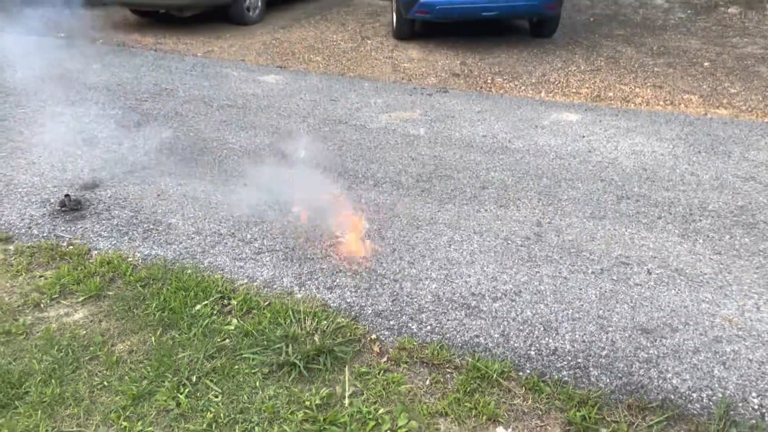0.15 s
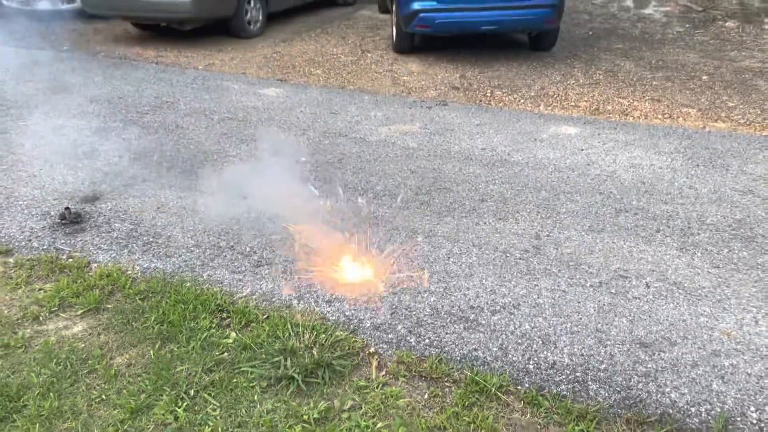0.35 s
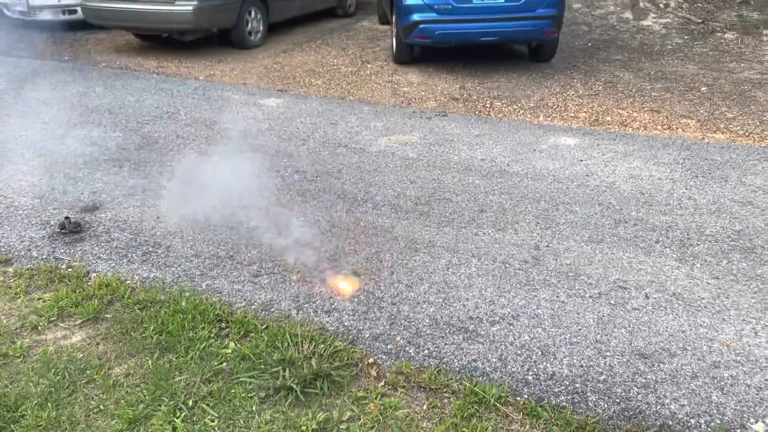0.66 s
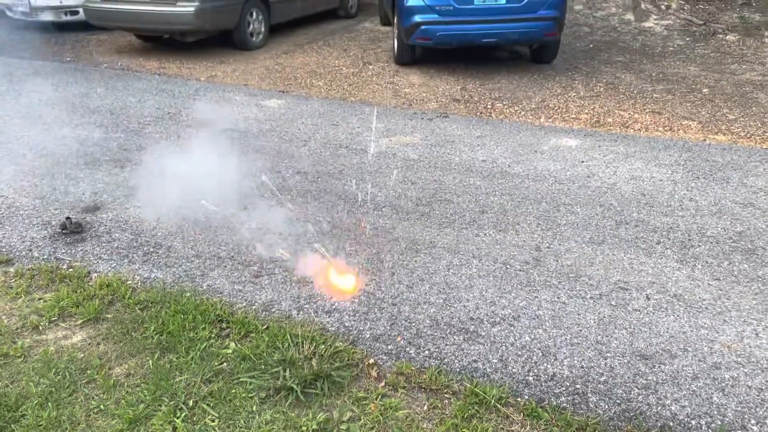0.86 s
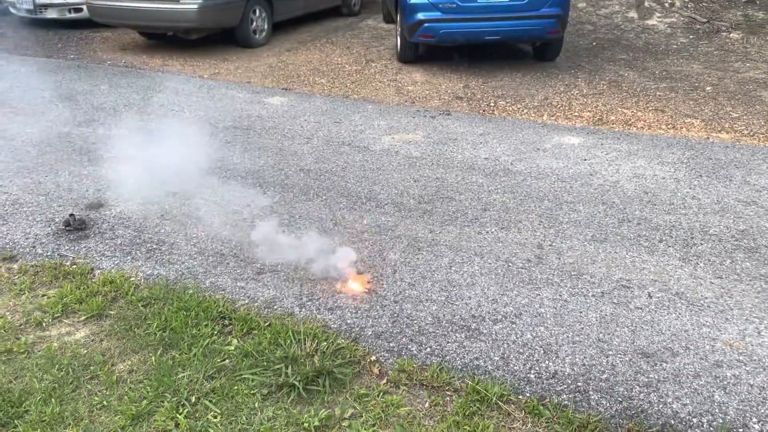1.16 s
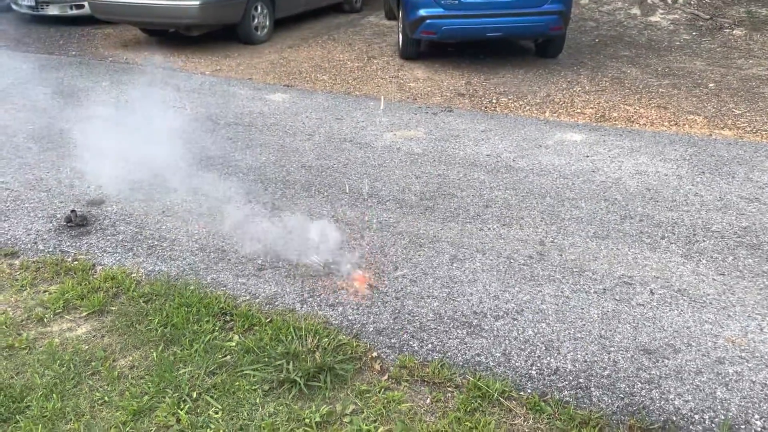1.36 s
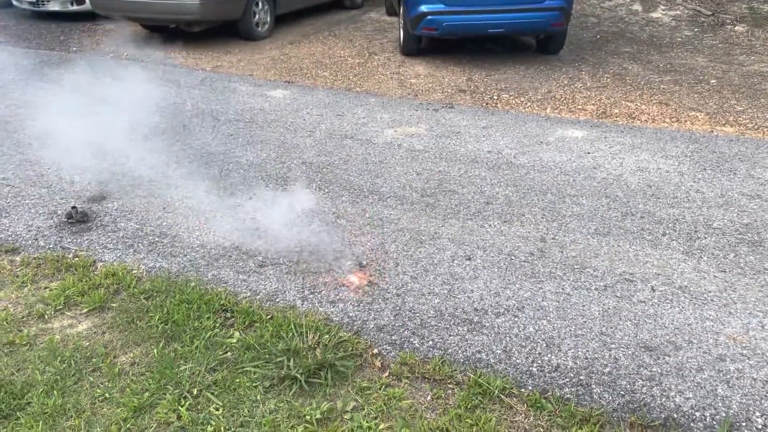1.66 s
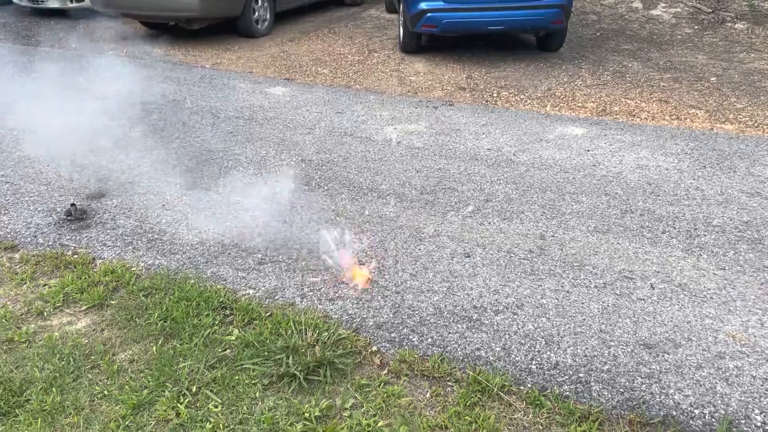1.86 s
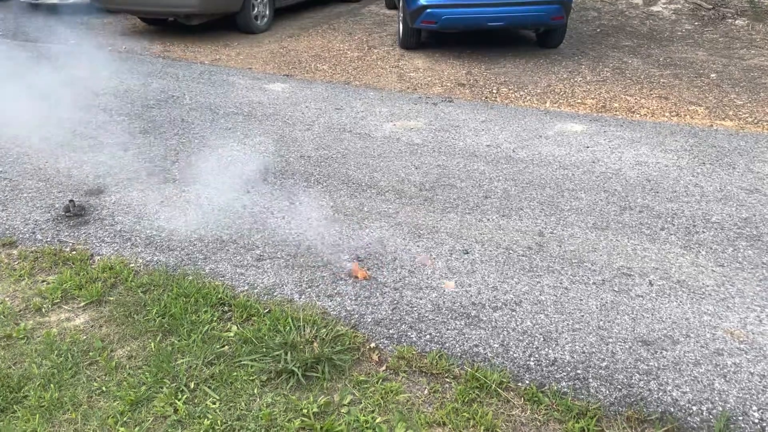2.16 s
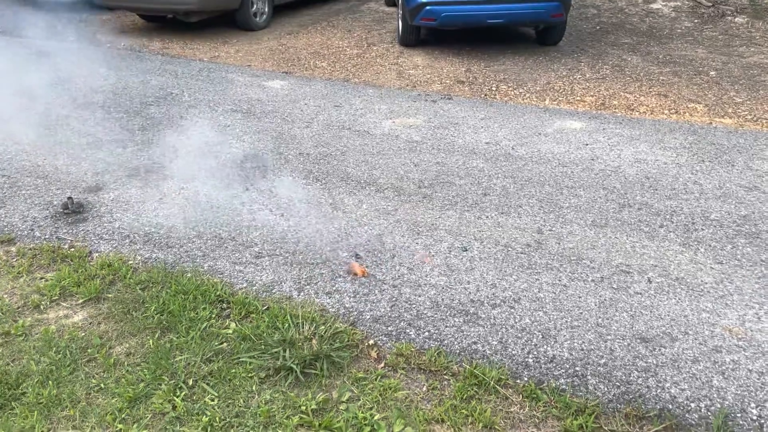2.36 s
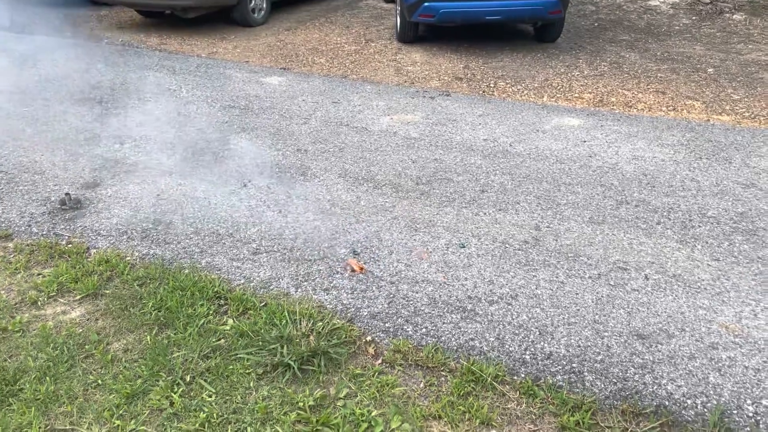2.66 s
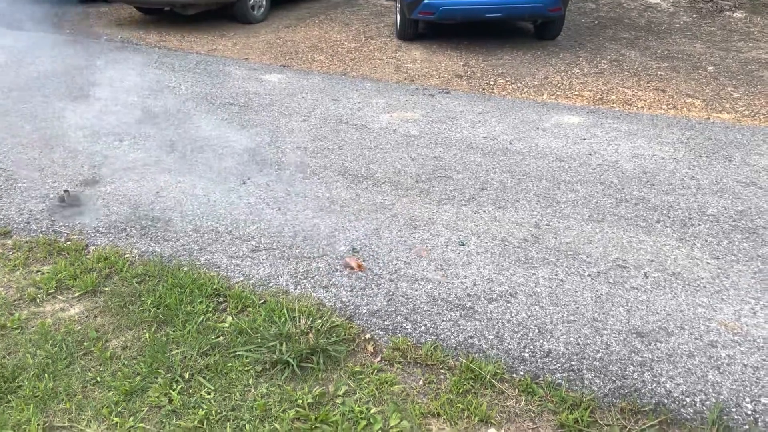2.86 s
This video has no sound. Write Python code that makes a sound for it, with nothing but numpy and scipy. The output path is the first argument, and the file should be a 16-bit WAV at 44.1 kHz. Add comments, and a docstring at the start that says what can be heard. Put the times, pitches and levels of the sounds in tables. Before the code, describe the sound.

Bright cracking pops from a burning firework, tightly bunched then more widely spaced, each with a brief echo off cars and yard. The soft flame roar fades to near silence before a final single pop.

```python
"""Small firework burning out on a gravel drive

Sharp pops, dense at first, then scattered over three seconds. Each is a click with a short noise splutter,
a hollow knock and a falling thump; nearby walls and cars send back slaps and the yard rings on in decaying
noise. Under it the flame is shaped noise, with a wavering low hum of sines and faint outdoor hiss.
Two microphone ports hear it slightly apart; splutter and knock smear ahead of each pop, as audio coding does."""
import sys
import numpy as np
from scipy import signal
from scipy.fft import rfft, irfft, next_fast_len
from scipy.io import wavfile
from scipy.ndimage import uniform_filter1d

SR = 44100
rng = np.random.default_rng(int(sys.argv[2]) if len(sys.argv) > 2 else 0)


def transcribe(signal):
    """Save signal, clipped to [-1, 1], as a 16-bit WAV file at the path in sys.argv[1]."""
    frames = np.atleast_2d(signal).T
    limited = np.clip(frames, -1, 1)
    pcm = np.round(limited * 32767).astype(np.int16)
    wavfile.write(sys.argv[1], SR, pcm)


N = 132300  # samples, 3 s

# The pops, levels relative within each column. Each row: start in seconds, crack peak in dB,
# splutter in dB, knock in dB, thump in dB, yard ring in dB, slaps in dB.
POPS = [(0.0039, -23.5, -46, -57, -52, -39, -55.5), (0.1259, -12, -15, -13.5, -15.5, -30, -49.5),
        (0.1484, -15, -17.5, -5, -60, -43, -48.5), (0.1498, -12, -13.5, -9, -40, -47, -48.5),
        (0.1516, -16, -18, -16.5, -8, -43.5, -50), (0.198, -12.5, -25, -42.5, -39, -41, -49.5),
        (0.2533, -3, -35.5, -39.5, -53, -34.5, -49), (0.2815, -26, -37.5, -51, -56, -45, -51),
        (0.2928, 0, -23, -24, -16.5, -39.5, -46.5), (0.3164, 2, -29.5, -38, -27.5, -41.5, -58),
        (0.3331, -4.5, -26, -31, -43, -50, -49.5), (0.3409, -20, -33, -38.5, -41.0, -60.5, -62.5),
        (0.3467, -6, -33, -41, -75, -44, -50.5), (0.3767, -7, -13.5, -33, -32.5, -41, -54),
        (0.3799, -14, -31.5, -32.5, -38.5, -50, -47.5), (0.514, -9, -15.5, -17.5, -16.5, -28, -45),
        (0.5152, -11.5, -23, -22.5, -66, -71, -48), (0.5581, -2, -26, -36.5, -31.5, -30, -37.5),
        (0.5796, 0, -18.5, -27.5, -20, -34, -39), (0.5929, 2.5, -29.5, -26, -23.0, -31.5, -44),
        (0.6084, -1, -21.5, -37, -32, -42, -39.5), (0.6181, -1, -21, -33, -30, -38.5, -46.5),
        (0.712, -3.5, -23.5, -43, -33.5, -44, -44), (0.727, -1, -29.0, -37.5, -35.5, -56.5, -56),
        (0.7858, -22, -35.5, -46, -38, -39, -59), (0.8602, -1.5, -14, -27.5, -16.5, -29, -38.5),
        (0.9631, 3.5, -17.5, -30, -32.5, -35.0, -40), (1.0225, -4, -25.5, -38, -43, -41, -43.5),
        (1.072, -1.5, -17, -29.5, -23.5, -27.5, -36.5), (1.215, -2.5, -18, -33, -29.5, -35.0, -40),
        (1.3075, 3, -19.5, -23.5, -22.5, -32, -33.5), (1.322, -6, -13.5, -18.5, -17, -41, -41.5),
        (1.3618, 0, -23, -32, -26.5, -34.5, -39), (1.4206, -12, -36, -32, -34.5, -40.5, -51),
        (1.5817, -31.5, -50.5, -55, -43, -59, -75), (1.7, -1, -14, -22.5, -16.5, -29.5, -34.5),
        (1.854, -3, -26.5, -39, -30.5, -34, -40), (1.8569, 2, -13.5, -27.5, -25, -38, -37),
        (2.9078, -2.5, -32.0, -59.5, -46, -45.5, -49)]


def amp(db):
    """Amplitude factor for a level in dB."""
    return 10 ** (np.asarray(db, float) / 20)


def evened(x):
    """Scales a signal to an RMS of one."""
    return x / np.sqrt(np.mean(x ** 2) + 1e-20)


def read(points, at, axis=1):
    """Reads one table column along straight lines."""
    return np.interp(at, [p[0] for p in points], [p[axis] for p in points])


def read_log(points, hz, axis=1):
    """Reads one table column along a logarithmic frequency scale."""
    return np.interp(np.log(hz + 1), np.log([p[0] + 1 for p in points]), [p[axis] for p in points])


def coloured(x, tone):
    """Shapes a signal by a spectrum given in dB."""
    hz = np.fft.rfftfreq(len(x), 1 / SR)
    return irfft(rfft(x) * amp(read_log(tone, hz)), len(x))


def coloured_noise(tone):
    """Steady noise of the given spectrum, at an RMS of one."""
    return evened(coloured(rng.standard_normal(N), tone))


def pair(shared, make):
    """Two signals, partly the same: shared runs from 0 (independent) to 1 (identical)."""
    shared = np.clip(shared, 0, 1)
    left = make()
    right = shared * left + np.sqrt(1 - shared ** 2) * make()
    return np.array([left, right])


def narrow(hz, width_hz):
    """A fuzzy tone: slow complex noise carried up to hz, at an RMS of one."""
    pole = np.exp(-np.pi * width_hz / SR)
    noise = rng.standard_normal(N + SR) + 1j * rng.standard_normal(N + SR)
    slow = signal.lfilter([1], np.convolve([1, -pole], [1, -pole]), noise)
    carrier = np.exp(2j * np.pi * hz * np.arange(N) / SR)
    return evened((slow[SR:] * carrier).real)  # the first second lets the filter settle


def clicks(axis):
    """One impulse per pop, sized by one column of POPS."""
    out = np.zeros(N)
    for row in POPS:
        out[round(row[0] * SR)] += amp(row[axis])
    return out


def air():
    """Faint steady outdoor hiss: shaped noise, little of it common to both ports."""
    # Spectrum of the air. Each row: frequency in Hz, relative level in dB.
    air_tone = [(18, -44), (30, -14.5), (113, -12.5), (969, -27), (2870, -40), (7270, -36), (8530, -44.5),
                (10800, -32.5), (17000, -57.5)]
    return amp(-69.5) * pair(0.2, lambda: coloured_noise(air_tone))


def hum():
    """A low hum of sines on multiples of one wandering pitch, each wavering in level by itself."""
    # Fading of the hum. Each row: time in seconds, level in dB.
    hum_fade = [(0, -48), (.6, -61), (1.7, -62.5), (2.2, -67.5), (2.72, -67.5), (2.82, -82.5), (3, -83)]
    # Its overtones. Each row: multiple of the pitch, relative level in dB.
    hum_orders = [(1, 0), (2, -11), (3, -10), (4, -16)]
    pitch_hz, wander_hz, waver_db = 108.7, 2.5, 2.5  # wander and waver are RMS
    turns = np.cumsum(pitch_hz + wander_hz * narrow(2.6, 12)) / SR
    tone = np.zeros(N)
    for order, db in hum_orders:
        tone += amp(db + waver_db * narrow(4, 6)) * np.sin(2 * np.pi * order * turns)
    return np.sqrt(2) * tone * amp(read(hum_fade, np.arange(N) / SR))


def flame():
    """Lumpy narrow-band rumble, and a dull roar with hiss, all dying with the burn."""
    # Course of the burn. Each row: time in seconds, rumble in dB, roar in dB, hiss in dB.
    burn = [(0, -48.5, -50, -49.5), (.11, -43, -45.5, -43.5), (.22, -41, -55.5, -55),
            (.34, -52, -53.5, -57), (.96, -45, -62, -58.5), (1.13, -53, -59.5, -65),
            (1.36, -53.5, -65, -57), (1.5, -57, -65, -64), (1.84, -50.5, -64, -62), (1.93, -65, -65.5, -62),
            (2.15, -66, -68, -68), (2.49, -83, -74, -73), (3, -80.5, -66.5, -72.5)]
    # Spectrum of the roar. Each row: frequency in Hz, relative density in dB per Hz.
    roar_tone = [(60, -9), (150, -2.4), (350, -4), (700, -22.5), (3000, -45.5)]
    # Spectrum of the hiss. Each row: frequency in Hz, relative density in dB per Hz.
    hiss_tone = [(200, -19), (550, -1), (1200, -4.5), (2500, -5), (6000, -22), (16000, -27.5)]
    t = np.arange(N) / SR
    rumble = pair(0.8, lambda: narrow(50, 45))
    rumble = rumble * amp(-1.2 * narrow(7.7, 4.3))  # lumps of 1.2 dB RMS
    roar = pair(0.6, lambda: coloured_noise(roar_tone))
    hiss = pair(0.4, lambda: coloured_noise(hiss_tone))
    rumble = rumble * amp(read(burn, t, axis=1))
    return rumble, roar * amp(read(burn, t, axis=2)) + hiss * amp(read(burn, t, axis=3))


def ring():
    """Grainy late scatter from the yard: noise in which each band dies at its own speed."""
    # Decay of the yard. Each row: frequency in Hz, time to fall by 60 dB in seconds.
    decay_times = [(150, .3), (500, 0.17), (1500, .75), (4000, 0.77), (9000, 0.61), (15000, .5)]
    # Spectrum of the ring at its start. Each row: frequency in Hz, relative level in dB.
    ring_tone = [(100, -3), (400, -10), (1000, -9), (1600, -0.5), (2300, -6), (3300, 0), (4500, -4),
                 (5800, 0), (7500, -2.5), (11000, -7), (13000, -5.5), (16000, 0)]
    start_s, rise_s, grain_db = .012, .014, 3
    size = SR + SR // 2
    grain = amp(grain_db * evened(uniform_filter1d(rng.standard_normal(size), 60)))
    hz, t, bands = signal.stft(evened(rng.standard_normal(size) * grain), SR, nperseg=256)
    fall_db = 60 * t / read_log(decay_times, hz)[:, None]
    bands = bands * amp(read_log(ring_tone, hz)[:, None] - fall_db)
    tail = signal.istft(bands, SR, nperseg=256)[1]
    late = np.maximum(np.arange(len(tail)) / SR - start_s, 0)
    return tail * (1 - np.exp(-late / rise_s))


def slaps():
    """Short smeared returns from nearby walls and cars: decaying noise bursts, each after its own delay."""
    # The returns. Each row: delay in seconds, relative level in dB, spread (decay) in seconds,
    # treble tilt above 2 kHz in dB per octave.
    returns = [(0.015, -6.5, .001, -7.2), (0.0258, 6, 0.0012, -4), (0.032, -9, 0.0017, -0.6),
               (.042, -3, 0.00091, 2.5), (.0449, 3, .0006, -2.06), (0.0553, 12, 0.00016, 3.5)]
    size = 4096
    t, out = np.arange(size) / SR, np.zeros(size)
    for delay, db, spread, tilt_db in returns:
        tone = [(500, -tilt_db - 7.0), (2000, -tilt_db), (16000, 2 * tilt_db)]
        burst = evened(coloured(rng.standard_normal(size), tone))
        fall = np.exp(-np.maximum(t - delay, 0) / spread)
        out += amp(db) * burst * (t > delay) * fall
    return out


def yard():
    """Ring and slaps: successive pops take turns among three random tails, so their echoes vary."""
    late, near, out = clicks(axis=5), clicks(axis=6), np.zeros((2, N))
    turn = np.cumsum(late > 0) % 3
    for tail in range(3):
        chosen = turn == tail
        out += signal.fftconvolve((late * chosen)[None], pair(0.86, ring), axes=1)[:, :N]
        out += amp(10.5) * signal.fftconvolve(near * chosen, slaps())[:N]
    return out


def knocks():
    """A short hollow 1270 Hz knock dying after each crack, smeared ahead of it as by audio coding."""
    knock_hz, smear_s, decay_s = 1270, 0.0019, 0.0012
    t = np.arange(-600, 600) / SR
    envelope = np.exp(np.where(t < 0, t / smear_s, -t / decay_s))
    wave = envelope * np.cos(2 * np.pi * knock_hz * t)
    return signal.oaconvolve(clicks(axis=3), wave)[600:600 + N]


def thumps():
    """The pressure push, drawn out into a wave whose swings grow longer; stronger pushes last longer."""
    turns, first_s, soft_s = .94, .004, 0.0018  # turns: cycles per e-fold of time; soft_s: onset
    decay_s, longer_per_db, ref_db = 0.011, 0.0552, -18  # decay_s holds at ref_db in the thump column
    size = 4000
    t, out = np.arange(1, size + 1) / SR, np.zeros(N + size)
    wave = np.cos(2 * np.pi * turns * np.log(t / first_s)) * (1 - np.exp(-(t / soft_s) ** 2))
    for row in POPS:
        start, db = round(row[0] * SR), row[4]
        decay = decay_s * np.exp(longer_per_db * (db - ref_db))
        out[start:start + size] += amp(db + 3.0) * wave * np.exp(-t / decay)
    return out[:N]


def cracks():
    """A sharp click, its ground bounce and a few milliseconds of splutter with a faint dull smear ahead."""
    # Spectrum of the splutter. Each row: frequency in Hz, relative level in dB.
    splutter_tone = [(200, -1), (600, -4.5), (850, -2), (1270, 8), (1450, -10), (1630, 7.5), (1850, 8),
                     (2150, -2), (2550, 4), (3200, 1.5), (4500, -2.5), (8000, -7.5), (16000, -5.5)]
    decay_s, smear_s, smear_db, smear_top_hz = .0017, .0022, -5, 8000
    bounce_s, bounce_db = .00038, -13
    t = np.arange(700) / SR
    size = clicks(axis=2)
    after = signal.oaconvolve(size, np.exp(-t / decay_s))[:N]
    # A decay run backwards in time: the smear ahead of each pop, as left by audio coding.
    before = signal.oaconvolve(size[::-1], np.exp(-t / smear_s))[:N][::-1] * amp(smear_db)
    dull = signal.butter(6, smear_top_hz, fs=SR, output="sos")

    def splutter():
        """Noise under the two envelopes, the smear low-passed."""
        burst = after * rng.standard_normal(N)
        smear = signal.sosfilt(dull, before * rng.standard_normal(N))
        return coloured(burst + smear, splutter_tone)

    grit = pair(0.67, splutter)
    click = clicks(axis=1)
    bounce = -amp(bounce_db) * np.roll(click, round(bounce_s * SR))  # inverted return from the ground
    return amp(8.5) * (click + bounce) + amp(11.5) * grit


def ports(left, right, flat=False):
    """Colour of each microphone port, unless flat: minimum phase on the left, a table turning the right."""
    # Colour of the ports. Each row: frequency in Hz, left in dB, right in dB.
    port_tone = [(100, -13.5, -28), (278, -25.5, -19.5), (556, -5, -7), (1300, -5.5, -5.5),
                 (1620, -10.5, -8.5), (2213, 3.5, -6), (2410, -6, 0.5), (2910, -7, -9), (3600, -5.5, -12.5),
                 (4466, -1.5, 0.5), (4980, -7, -13), (6370, -3.5, -3.5), (7020, -11.5, 4.5),
                 (7260, 3.96, 3), (8980, 1.5, 2), (10750, 0.5, 0.5), (12300, -14.5, -20.5),
                 (14400, -2, 0.5), (16000, -33, -31)]
    # Phase between the ports. Each row: frequency in Hz, lead of the left port in radians.
    left_lead = [(0, 3.5), (50, -0.83), (150, -1.44), (350, -1.1), (620, -0.87), (950, -1.37), (1400, 2.6),
                 (1550, -1), (2200, -6.5), (3600, -5), (5000, -5), (5700, -5), (6800, -4.5), (15500, 4),
                 (22050, 7.5)]
    size = next_fast_len(N + 4096)
    hz = np.fft.rfftfreq(size, 1 / SR)
    gain_db = [read_log(port_tone, hz, axis=1), read_log(port_tone, hz, axis=2)]
    log_gain = np.log(amp(gain_db)) * (not flat)
    # Minimum phase of the left colour; the right port takes it too, less the lead.
    mirrored = np.r_[log_gain[0], log_gain[0, -2:0:-1]]
    phase = -signal.hilbert(mirrored).imag[:len(hz)]
    phase = np.array([phase, phase - read(left_lead, hz)])
    return irfft(rfft(np.array([left, right]), size) * np.exp(log_gain + 1j * phase), size)[:, :N]


def scene():
    """Cracks and yard through the coloured ports, the other sources with the phase turn or straight in."""
    rumble, roar = flame()
    bright = ports(*(cracks() + yard()))
    uncoloured = ports(*(thumps() + knocks() + roar + air()), flat=True)
    return bright + uncoloured + rumble + hum()


def record(dry):
    """Bass roll-off; the loudest peaks saturate softly; then the band limit."""
    bass_cut_hz, ceiling, edge_hz = 24, .93, 17100  # ceiling: fraction of full scale
    thin = signal.sosfilt(signal.butter(2, bass_cut_hz, "high", fs=SR, output="sos"), dry)
    soft = ceiling * np.tanh(thin / ceiling)
    band = signal.firwin(511, edge_hz, window=("kaiser", 9), fs=SR)
    return signal.oaconvolve(soft, band[None], "same")


dry = scene()
out = record(dry)
transcribe(out)
```